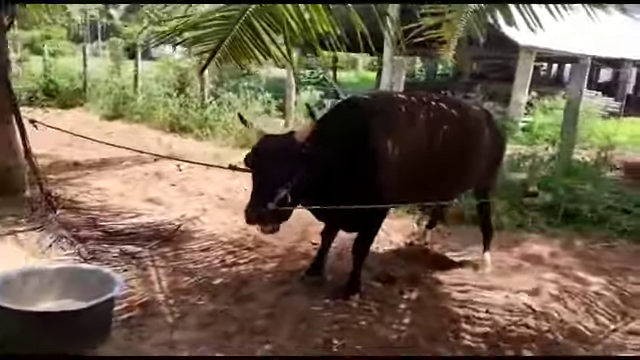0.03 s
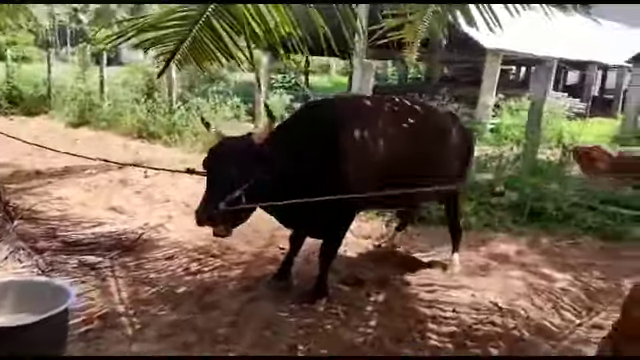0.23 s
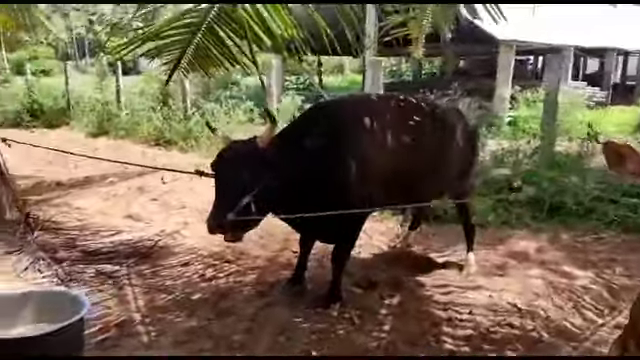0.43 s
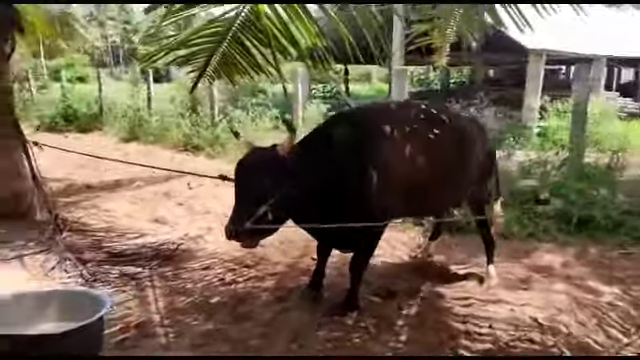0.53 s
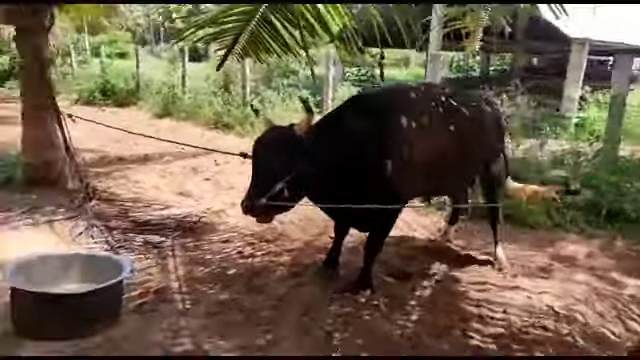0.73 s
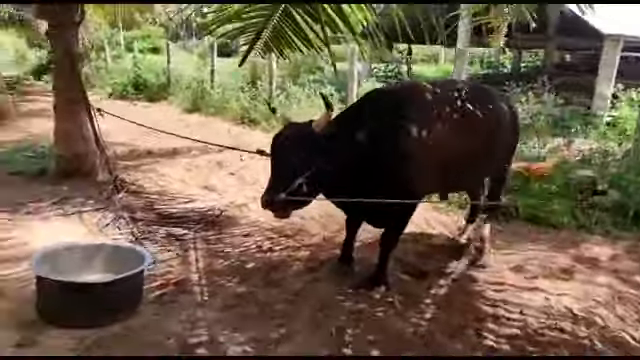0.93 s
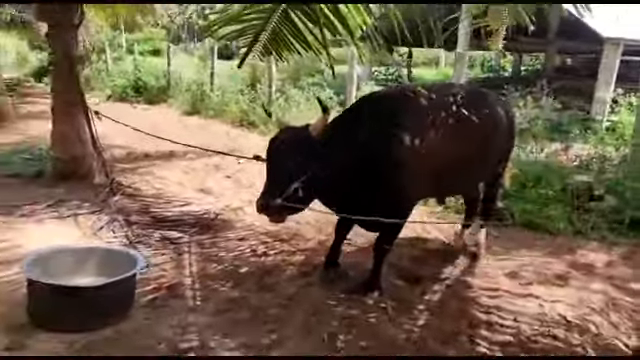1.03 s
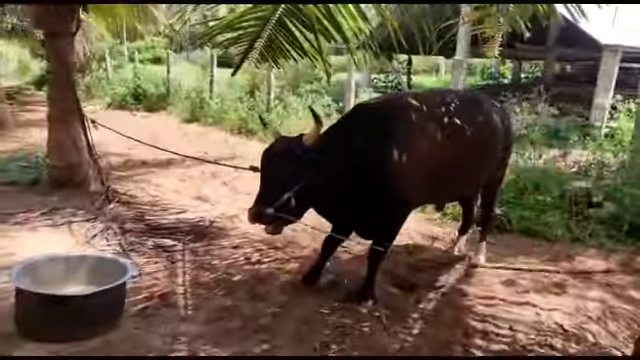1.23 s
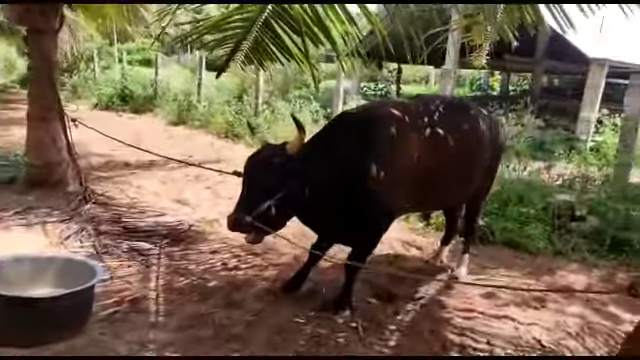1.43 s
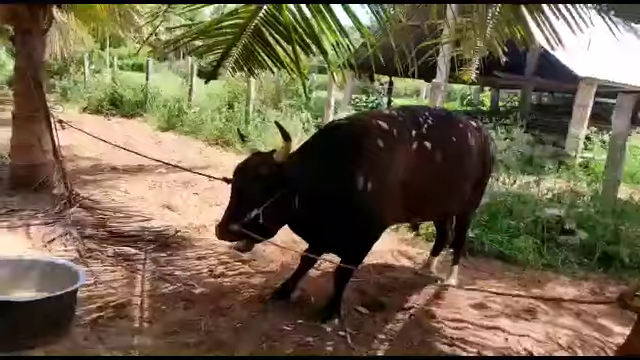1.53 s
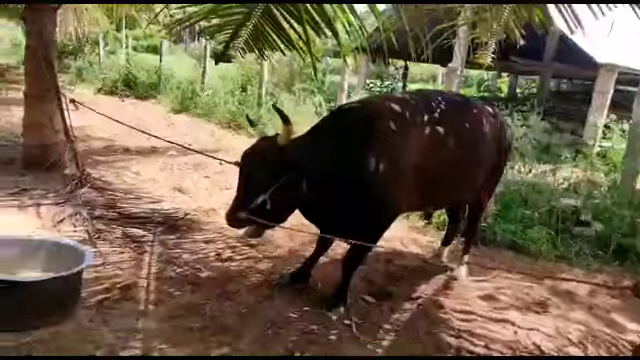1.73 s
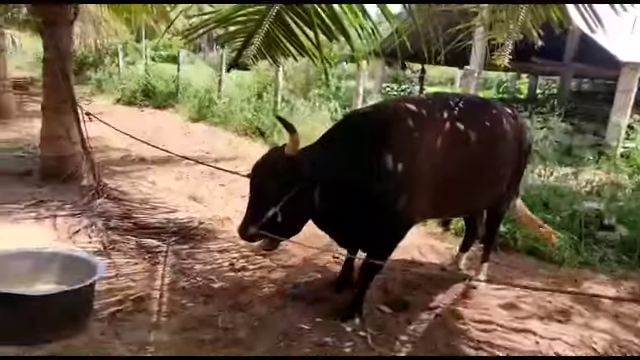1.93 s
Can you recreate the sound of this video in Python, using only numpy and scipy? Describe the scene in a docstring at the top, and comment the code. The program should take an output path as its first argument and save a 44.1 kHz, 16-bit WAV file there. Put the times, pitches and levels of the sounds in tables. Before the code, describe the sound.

A bull bellows once, a few metres away. After a soft hiss of breath, the call catches roughly at 0.2 seconds and swells, deep and breathy, loudest from about 0.4 to 0.8 seconds. It then sinks into a lower, softer, muffled drone that stops at 1.8 seconds. A tiny tick and a brief faint low hum follow, over quiet outdoor air.

```python
"""Bull bellowing in a farmyard

A tethered bull bellows once, a few metres away. Air hisses through its muzzle and the vocal folds
catch roughly, then pulse through the resonances of throat, mouth and head. The call swells with the
mouth open and sinks to a long, nearly closed drone. A small tick and a faint low hum follow over
the quiet yard."""
import sys
import numpy as np
from scipy import signal
from scipy.fft import rfft, irfft, next_fast_len
from scipy.io import wavfile
from scipy.ndimage import uniform_filter1d, minimum_filter1d, map_coordinates

SR = 44100
rng = np.random.default_rng(int(sys.argv[2]) if len(sys.argv) > 2 else 0)


def transcribe(signal):
    """Save signal, clipped to [-1, 1], as a 16-bit WAV file at the path in sys.argv[1]."""
    frames = np.atleast_2d(signal).T
    limited = np.clip(frames, -1, 1)
    pcm = np.round(limited * 32767).astype(np.int16)
    wavfile.write(sys.argv[1], SR, pcm)


N = 88200

# Pitch line of the vocal folds: t/s, f/Hz
FOLD_PITCH = [(0.2, 108.1), (0.27, 112.6), (0.292, 115.7), (0.332, 117.4), (0.372, 124.8), (0.39, 127),
              (0.498, 120.8), (0.604, 112.7), (0.712, 111.8), (0.84, 99.75), (0.934, 95.74), (1.112, 95.58),
              (1.158, 91.88), (1.438, 87.9), (1.562, 88.95), (1.718, 85.57), (1.746, 82.3), (1.8, 72.7)]
# Grit in the voice: t/s, roughness/0-1
ROUGHNESS = [(.18,1),(.25,0.8),(.3,0.58),(.4,0.12),(.72,0.28),(.85,0.15),(1.05,0.37),(1.125,0.48),(1.17,0.27),(1.35,0.33),(1.41,0.34),(1.48,0.21),(1.55,0.32),(1.68,0.13),(1.8,0.55)]
# Body of the call: t/s, throat level/dB, mouth level/dB
THROAT_MOUTH_LEVELS = [(0.18, -26, -34), (0.214, -31, -36), (0.227, -18, -22), (0.246, -25, -28),
                       (0.289, -17, -24.5), (0.368, -18, -15.5), (0.395, -22.5, -15.5),
                       (0.538, -15.5, -14.5), (0.575, -12, -18.5), (0.624, -15, -20), (0.756, -15.5, -19.5),
                       (0.82, -22.5, -20.5), (0.888, -24, -19), (0.988, -21.5, -24), (1.096, -24.5, -27.5),
                       (1.118, -24, -23), (1.146, -22.5, -25), (1.242, -24, -24), (1.359, -25, -28.5),
                       (1.5, -24.5, -24.5), (1.705, -24.5, -25), (1.749, -27, -34.5), (1.81, -44.5, -58)]
# Centre of the mouth resonance: t/s, f/Hz
MOUTH_SWEEP = [(.22,513),(0.3,480),(.39,516),(.52,480),(0.609,491),(.72,504),(.78,560),(.92,555),(1.149,545.9),(1.45,549),(1.75,492)]
# Envelope of the midrange resonance: t/s, level/dB
MID_LEVEL = [(0.18, -30), (0.22, -31.5), (0.247, -42), (0.292, -25.5), (0.742, -23), (0.774, -20.5),
             (0.882, -28.5), (0.928, -23.5), (0.988, -32), (1.128, -27.5), (1.382, -37), (1.56, -35),
             (1.71, -38.5), (1.81, -58)]
# Centre of the midrange resonance: t/s, f/Hz
MID_SWEEP = [(.3,1007),(.6,943),(.78,930),(.95,943),(1.12,903),(1.3,864),(1.42,913),(1.52,975.4),(1.75,963)]
# Envelope of the upper-mid resonance: t/s, level/dB
UPPER_MID_LEVEL = [(.18,-45),(.34,-25.5),(.48,-24.5),(.6,-34.5),(0.791,-30),(.83,-48),(1.02,-46),(1.1,-38),(1.4,-41.5),(1.55,-38),(1.66,-36),(1.79,-48.5),(1.81,-72)]
# Bright overtones, up while the mouth is open: t/s, level/dB
BRIGHTNESS = [(0.179, -44), (0.29, -20), (0.438, -24.5), (0.446, -22), (0.588, -21), (0.606, -23),
              (0.778, -22), (0.83, -37), (1.018, -43), (1.092, -37), (1.168, -44), (1.678, -43),
              (1.796, -50), (1.81, -62)]
# Head resonances: f/Hz, width/Hz, level/dB, share following brightness instead of mouth level/0-1
HEAD_MODES = [(335.8,16,7,0.59),(1258,93,8,1),(1388.5,103,6,0.92),(1730,160,-21,0),(2530,70,-21,0.8)]
# Antiresonances of the nasal passage: f/Hz, width/Hz, depth/0-1
NASAL_NOTCHES = [(270.5,7.4,0.96),(781,102,0.56)]
# Opening slaps of the folds: t/s, level/dB, tilt above SLAP_PIVOT_HZ/(dB per octave)
FOLD_SLAPS = [(.1765,-25,6),(.2135,-8.5,-3),(.2235,-12,0),(.2415,-24,9),(.2505,-16,-1),(.2595,-13.5,0)]
# Resonances that each slap rings: f/Hz, level/dB, T60/s
SLAP_RING = [(215,-7,.055),(440,-4,.04),(590,-5,.03),(1020,-12,.025),(1260,-13,.02),(1450,-17,.02)]
# Colour of the throat turbulence: f/Hz, level/dB
RASP_SPECTRUM = [(60,-35),(140,-24.5),(218,9.5),(300,-10.5),(400,-8.5),(490,3.5),(570,3),(690,-7),(790,-22.5),(960,0.5),(1100,-10),(1400,-24),(1800,-12),(4000,-51.5)]
# Stereo placement of the voice: f/Hz, left minus right/dB
VOICE_PAN = [(60, 9), (110, 2), (200, 3.5), (380, 3), (690, -0.5), (1280, 2.5), (2360, -2.5), (4360, 0.5),
             (8040, -1), (14800, -15)]
# Envelope of the breath, hiss and wheeze together: t/s, level/dB
BREATH_LEVEL = [(0.0, -46.5), (0.066, -35), (0.128, -37), (0.164, -41), (0.202, -33.5), (0.646, -34.5),
                (0.77, -38.5), (0.916, -39), (0.968, -43.5), (1.112, -44.5), (1.404, -48), (1.476, -43.5),
                (1.746, -47.5), (1.838, -64), (1.848, -55), (1.86, -75)]
# Stereo placement of the breath: f/Hz, left minus right/dB
BREATH_PAN = [(1500,1.5),(3000,-0.5),(5500,-1.5),(8000,-4.5),(11000,5.5)]
# Colour of the muzzle hiss: f/Hz, level/dB
HISS_SPECTRUM = [(100,-40.5),(400,-5.5),(700,3),(1200,0),(1400,0),(1580,-1),(1900,-8.5),(2300,-2.5),(3000,-3),(3800,-5),(5000,-11.5),(6200,-7.5),(7300,2),(8600,-1.5),(9400,-11.5),(10200,-24.5),(15000,-33.5)]
# Stereo image of the hiss: f/Hz, left-right correlation
HISS_IMAGE = [(500,0.89),(1500,-0.11),(3000,0.2),(8000,-0.37),(12000,0.4)]
# Wheezing air in the mouth: t/s, centre f/Hz, level within the breath/dB
WHEEZE_SWEEP = [(.2,3770,-23),(.31,3600,-2.5),(.42,3590,-6),(.47,2460,-1.5),(.66,2130,-3.5),(.8,2370,-10),(.95,1804,-16),(1.13,1680,-1.5),(1.35,1670,-3.5),(1.55,1740,-5.5),(1.8,1810,-6)]
# Muzzle resonances rung by each puff: f/Hz, width/Hz, level/dB
MUZZLE_MODES = [(1636,250,-1.5),(2204,335,-0.5),(2574,260,-4),(2980,290,-3.5),(3530,196,1.5),(4110,140,-2.5)]
# Colour of the tick: f/Hz, level/dB
TICK_SPECTRUM = [(500,-16),(1300,-3),(2300,0),(3500,-3),(5000,-14),(9000,-20),(12000,-48)]
# Envelope of the low hum: t/s, level/dB
HUM_LEVEL = [(1.74,-85),(1.825,-41),(1.865,-66),(1.89,-45.5),(1.94,-46.5),(2,-62)]
# Colour of the outdoor air: f/Hz, level/dB
YARD_SPECTRUM = [(25,7),(90,1),(150,-3.5),(300,4.5),(600,-10.5),(1200,-10),(3000,-16),(4300,-22),(5200,-20.5),(7500,-14),(9200,-13.5),(10500,-41.5),(15000,-41)]
# Stereo image of the outdoor air: f/Hz, left-right correlation
YARD_IMAGE = [(100, 0.63), (1000, 0.56), (4000, 0)]

START_S, STOP_S, ATTACK_S, RELEASE_S = 0.17, 1.82, 0.056, 0.018
JITTER_CYCLES, SHIMMER_DB, PUFF_DECAY_CYCLES = 0.071, 3, 0.25
THROAT_HZ, THROAT_WIDTH_HZ, MOUTH_WIDTH_HZ, MID_WIDTH_HZ = 192.9, 60.6, 102, 150
UPPER_MID_HZ, UPPER_MID_WIDTH_HZ = 1143.6, 136
SLAP_PIVOT_HZ, LOW_CUT_HZ, LEFT_LAG_S, MOUTH_DELAY_S = 500, 80, 0.00023, 0.00042
EARS = np.array([[.5], [-.5]])  # each side takes half of a left-right difference


def bull():
    """The bellow: fold pulses jitter and shimmer with roughness; rasp and breath puff in step."""
    pitch, = curves(FOLD_PITCH)
    rough, = curves(ROUGHNESS)
    t = np.arange(N) / SR
    voiced = np.clip((t - START_S) / ATTACK_S, 0, 1) * np.clip((STOP_S - t) / RELEASE_S, 0, 1)
    phase = np.cumsum(pitch) / SR + JITTER_CYCLES * rough ** 2 * wobble(110)  # in cycles
    burst = unit(np.exp(-(phase % 1) / PUFF_DECAY_CYCLES))
    pulsing = voiced * (burst - 1)
    grit = rough * rasp(pulsing)
    shimmer = amp(SHIMMER_DB * rough * wobble(59.92))
    voice = voiced * (shimmer * folds(phase) + grit) + slaps()
    voice = signal.sosfilt(signal.butter(6, LOW_CUT_HZ, "high", fs=SR, output="sos"), voice)
    lag = lambda hz: np.exp(-2j * np.pi * EARS * hz * LEFT_LAG_S)
    placed = filtered(voice, lambda hz: pan(VOICE_PAN, hz) * lag(hz))
    return placed + breath(voiced, pulsing)


def folds(phase):
    """The pulse train of the vocal folds, built overtone by overtone through the tract."""
    at, gains = tract()
    cycle = np.exp(2j * np.pi * phase)
    overtone, tone = np.ones(N, complex), np.zeros(N)
    for gain in gains:
        overtone = overtone * cycle
        tone += (np.interp(np.arange(N), at, gain) * overtone).real
    return np.sqrt(2) * tone


def tract(hop=128):
    """Throat, mouth and head boost overtones and the nose notches them: gains every hop samples."""
    controls = lambda *tables: [curve[::hop] for table in tables for curve in curves(table)]
    pitch, mouth_hz, mid_hz = controls(FOLD_PITCH, MOUTH_SWEEP, MID_SWEEP)
    throat_db, mouth_db, mid_db = controls(THROAT_MOUTH_LEVELS, MID_LEVEL)
    upper_mid_db, bright_db = controls(UPPER_MID_LEVEL, BRIGHTNESS)
    overtone_hz = np.arange(1, 45)[:, None] * pitch
    body = amp(throat_db + 0.5) * formant(overtone_hz, THROAT_HZ, THROAT_WIDTH_HZ)
    body[0] = -amp(-38 + 0.27 * (pitch - pitch.mean()))  # the fundamental grows as the pitch rises
    vowel = amp(mouth_db + 0.5) * formant(overtone_hz, mouth_hz, MOUTH_WIDTH_HZ)
    vowel += amp(mid_db + 0.5) * formant(overtone_hz, mid_hz, MID_WIDTH_HZ)
    vowel += amp(upper_mid_db - 1.5) * formant(overtone_hz, UPPER_MID_HZ, UPPER_MID_WIDTH_HZ)
    for hz, width, db, share in HEAD_MODES:
        level_db = db + share * bright_db + (1.5 - share) * mouth_db
        vowel += amp(level_db) * formant(overtone_hz, hz, width)
    gains = body + vowel * np.exp(-2j * np.pi * overtone_hz * MOUTH_DELAY_S)
    for hz, width, depth in NASAL_NOTCHES:
        gains *= 1 - depth * np.exp(-((overtone_hz - hz) / width) ** 2)
    return np.arange(N)[::hop], gains


def slaps():
    """The folds slap unevenly before they settle into a pitch, some slaps brighter than others."""
    out, t = np.zeros(N), np.arange(SR // 10) / SR
    for start_s, slap_db, tilt_db in FOLD_SLAPS:
        for hz, db, t60 in SLAP_RING:
            level_db = slap_db + db + tilt_db * max(np.log2(hz / SLAP_PIVOT_HZ), 0)
            ring = amp(level_db - 60 * t / t60) * np.sin(2 * np.pi * hz * t)
            out[round(start_s * SR):][:len(t)] += ring
    return out


def rasp(pulsing):
    """Throat turbulence, chopped by the folds: a low growl with an upper-mid edge."""
    _, mouth_db = curves(THROAT_MOUTH_LEVELS)
    upper_mid_db, = curves(UPPER_MID_LEVEL)
    turbulence = lambda colour: unit(filtered(puffs(pulsing, 0.71) * rng.standard_normal(N), colour))
    growl = amp(mouth_db + 2) * turbulence(lambda hz: amp(along(RASP_SPECTRUM, hz)))
    edge = amp(upper_mid_db + 5.5) * turbulence(lambda hz: peak(hz, UPPER_MID_HZ, 2 * UPPER_MID_WIDTH_HZ))
    return (growl + edge) * flutter(2.53)


def breath(voiced, pulsing):
    """Air through the muzzle: a wide hiss, joined by a wheeze while the voice sounds."""
    breath_db, = curves(BREATH_LEVEL)
    hiss = amp(-0.5) * puffs(pulsing, 0.22) * wide_noise(HISS_SPECTRUM, HISS_IMAGE) * flutter(1.1)
    wheezing = amp(2) * voiced * wheeze(pulsing) * flutter(1.1)
    return amp(breath_db) * filtered(hiss + wheezing, lambda hz: pan(BREATH_PAN, hz))


def wheeze(pulsing):
    """Puffs of air ring the muzzle; the mouth's shape favours the resonances near a moving centre."""
    centre_hz, level_db = curves(WHEEZE_SWEEP)
    reach_hz = 510
    weights = np.array([amp(db) / (1 + ((hz - centre_hz) / reach_hz) ** 2) for hz, _, db in MUZZLE_MODES])
    weights /= np.linalg.norm(weights, axis=0)
    rings = np.zeros((2, N))
    for weight, (hz, width, _) in zip(weights, MUZZLE_MODES):
        air = puffs(pulsing, 0.95) * rng.standard_normal((2, N))
        rings += weight * unit(filtered(air, lambda f: peak(f, hz, width)))
    return amp(level_db) * rings


def puffs(pulsing, depth):
    """Airflow envelope: one puff per fold cycle, from steady (depth 0) to fully chopped (1)."""
    return unit(1 + depth * pulsing)


def tick(start_s=1.8465, t60_s=0.02, level_db=-43):
    """One small, crisp tick after the call."""
    age = np.arange(N) / SR - start_s
    return amp(level_db - 60 * np.abs(age) / t60_s) * (age > 0) * noise(TICK_SPECTRUM)


def echo(x, level_db=-18, t60_s=0.14, predelay_s=0.006):
    """Short, weak scatter from ground, trees and shed."""
    t = np.arange(SR // 3) / SR
    tail = rng.standard_normal((2, len(t))) * amp(-60 * t / t60_s) * (t > predelay_s)
    return amp(level_db) * signal.fftconvolve(x, tail / np.linalg.norm(tail[0]), axes=1)[:, :N]


def hum(centre_hz=257.4):
    """A faint, slightly wavering low tone as the call ends."""
    level_db, = curves(HUM_LEVEL)
    pitch = centre_hz * (1 + 0.01 * wobble(22))
    return amp(level_db) * np.sqrt(2) * np.sin(2 * np.pi * np.cumsum(pitch) / SR)


def yard():
    """A steady bed of quiet outdoor air."""
    return amp(-52) * wide_noise(YARD_SPECTRUM, YARD_IMAGE)


def amp(db):
    """Decibels to gain."""
    return 10 ** (np.asarray(db) / 20)


def unit(x):
    """Scale to rms 1."""
    return x / np.sqrt(np.mean(x ** 2) + 1e-20)


def along(points, hz):
    """Read (f/Hz, value) points on a log frequency axis."""
    f, values = np.transpose(points)
    return np.interp(np.log(hz + 1), np.log(f + 1), values)


def pan(points, hz):
    """Left and right gains from a table of level differences."""
    return amp(EARS * along(points, hz))


def curves(rows):
    """One automation curve, sample by sample, for each column after the time."""
    times, *columns = np.transpose(rows)
    return [np.interp(np.arange(N) / SR, times, column) for column in columns]


def wobble(rate):
    """A smooth random curve with rate knots a second."""
    return map_coordinates(rng.standard_normal(2000), [np.arange(N) * rate / SR], mode="mirror")


def flutter(depth_db):
    """A gain that flickers quickly at random."""
    return amp(depth_db * wobble(39))


def peak(hz, centre_hz, width_hz):
    """Complex response of a steep resonance: two band-passes in series."""
    return (1j * hz * width_hz / (centre_hz ** 2 - hz ** 2 + 1j * hz * width_hz)) ** 2


def formant(overtone_hz, centre_hz, width_hz):
    """Gain of each overtone (rows) in a steep resonance, held at unit total power."""
    gain = peak(overtone_hz, centre_hz, width_hz)
    return gain / np.linalg.norm(gain, axis=0)


def filtered(x, response):
    """Shape x with a complex frequency response."""
    size = next_fast_len(N + SR // 2)
    return irfft(rfft(x, size) * response(np.fft.rfftfreq(size, 1 / SR)), size)[..., :N]


def noise(spectrum):
    """Coloured noise of rms 1."""
    return unit(filtered(rng.standard_normal(N), lambda hz: amp(along(spectrum, hz))))


def wide_noise(spectrum, correlation):
    """Coloured mid-side noise whose stereo width changes with frequency."""
    angle = lambda hz: np.arccos(along(correlation, hz)) / 2
    mid = filtered(noise(spectrum), lambda hz: np.cos(angle(hz)))
    side = filtered(noise(spectrum), lambda hz: np.sin(angle(hz)))
    return np.array([mid + side, mid - side]) / mid.std()


def scene():
    """Bull and tick up front with their echo; hum and yard air behind."""
    near = bull() + tick()
    return near + echo(near) + hum() + yard()


def record(dry, ceiling=0.86, smoothing_s=0.012, top_hz=15400):
    """A limiter holds down the loudest pulses, then a brick-wall low-pass trims the top."""
    size = round(smoothing_s * SR)
    needed = ceiling / np.maximum(np.abs(dry).max(axis=0), ceiling)
    gain = uniform_filter1d(minimum_filter1d(needed, 2 * size), size)
    return filtered(gain * dry, lambda hz: hz < top_hz)


dry = scene()
out = record(dry)
transcribe(out)
```